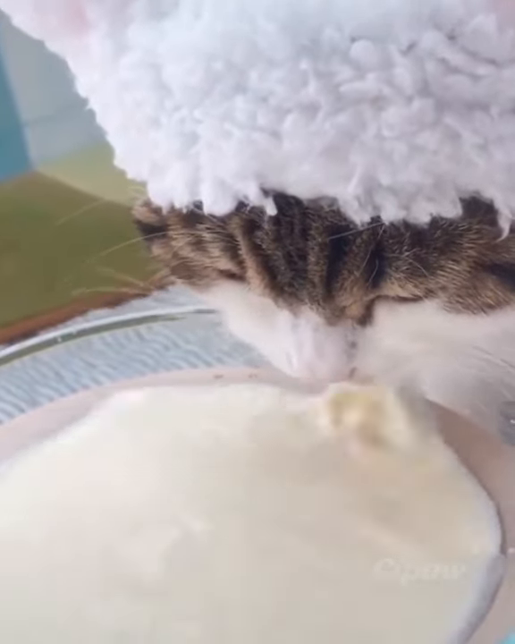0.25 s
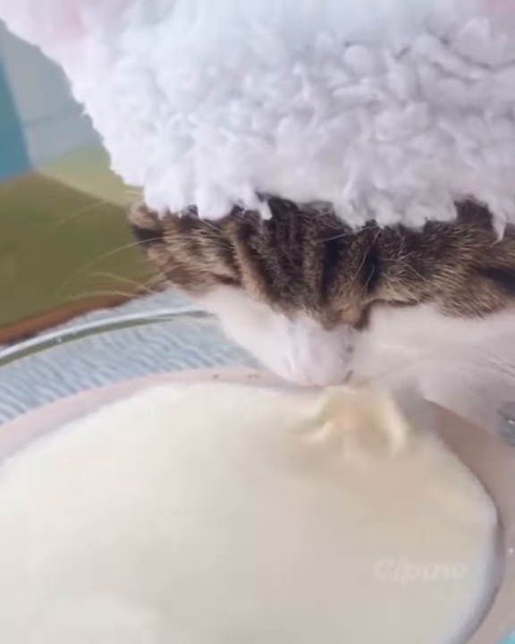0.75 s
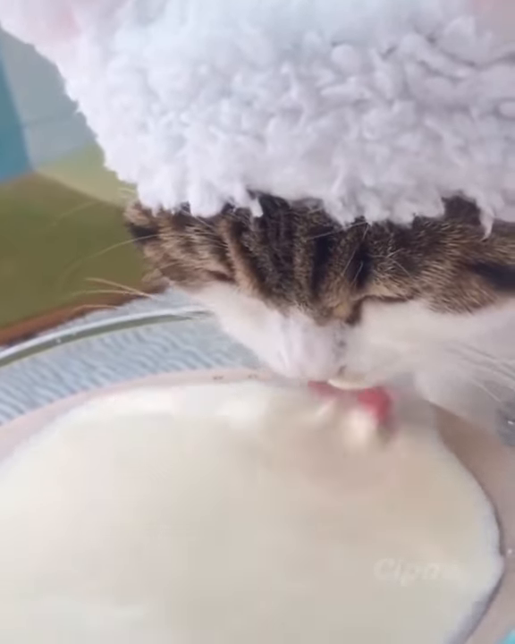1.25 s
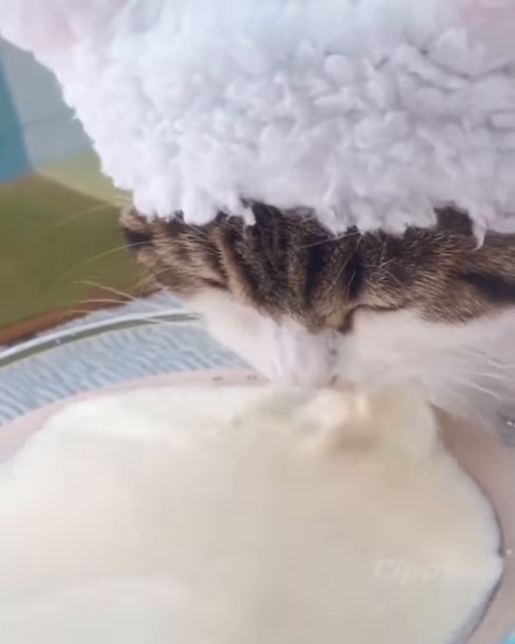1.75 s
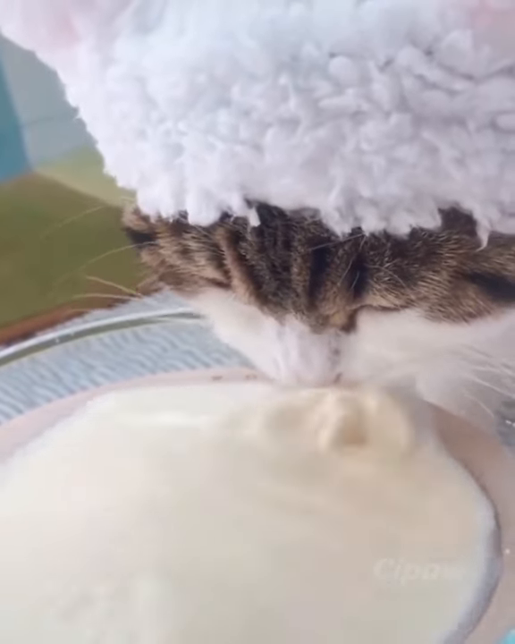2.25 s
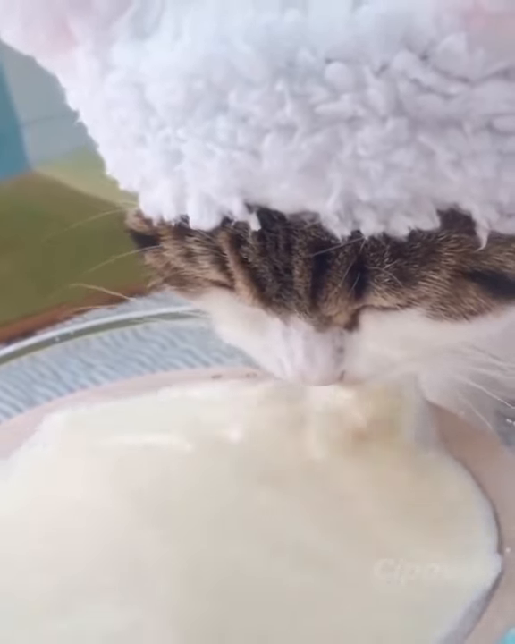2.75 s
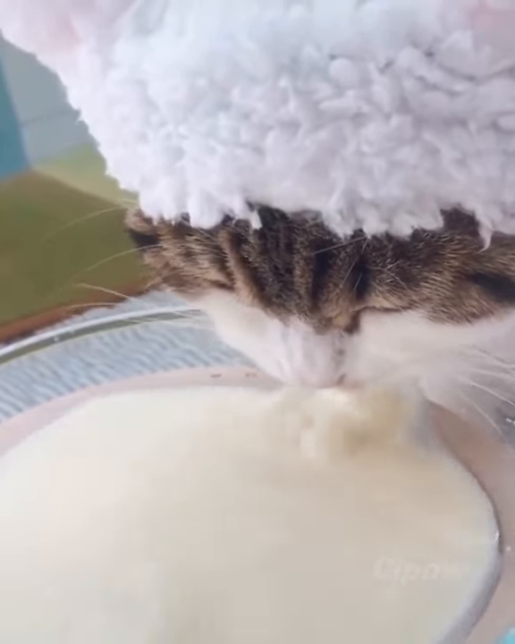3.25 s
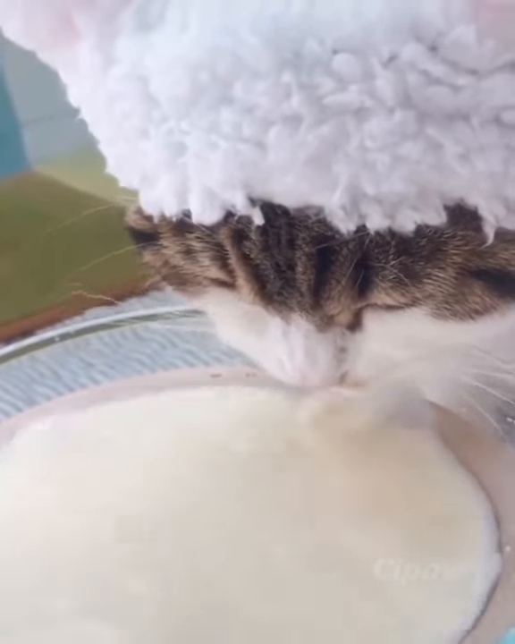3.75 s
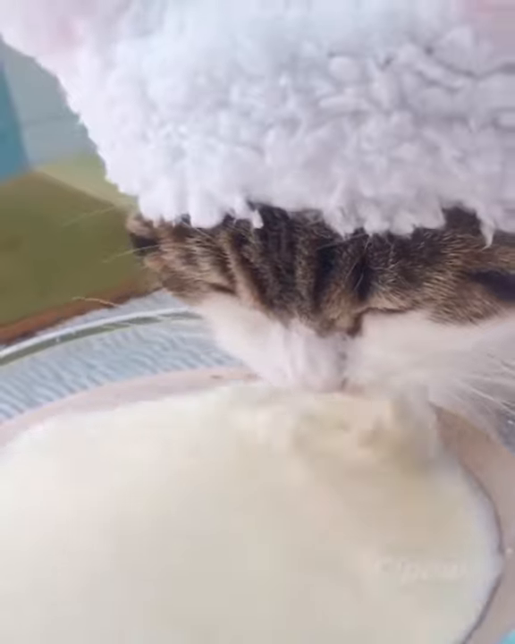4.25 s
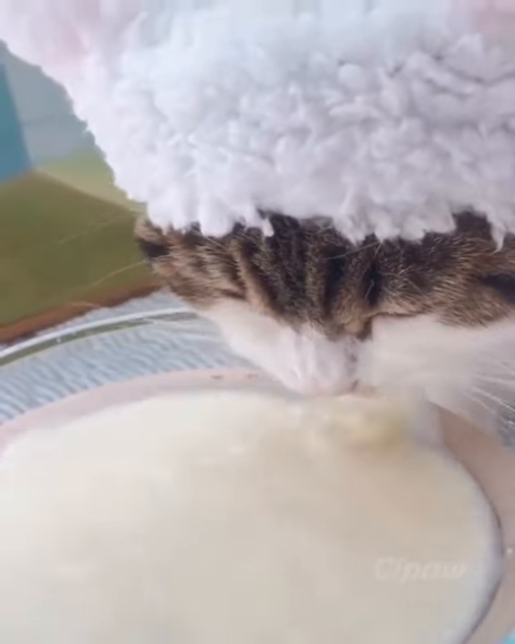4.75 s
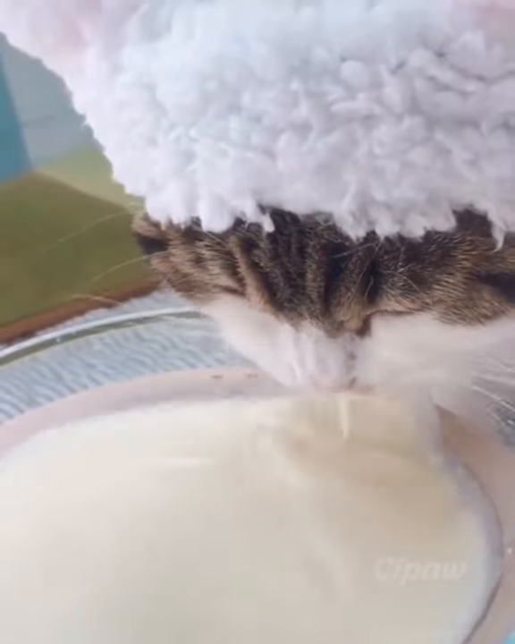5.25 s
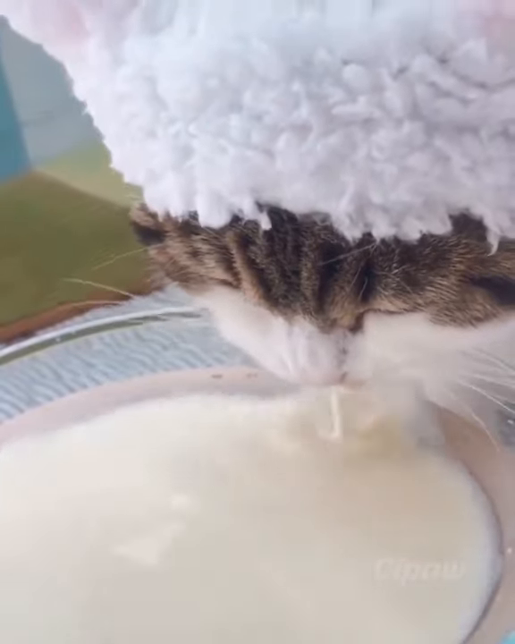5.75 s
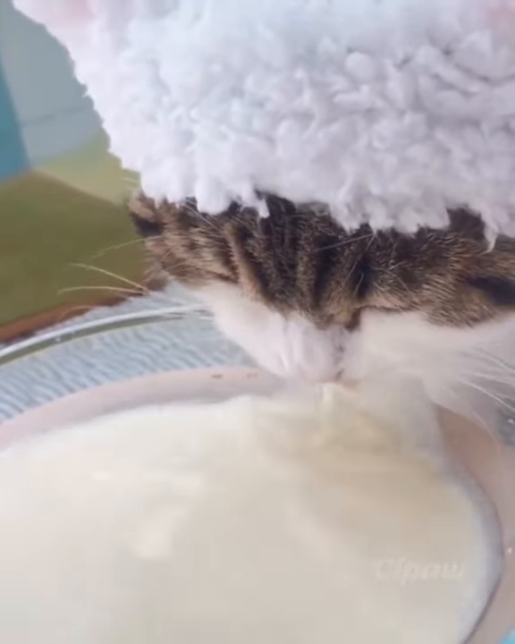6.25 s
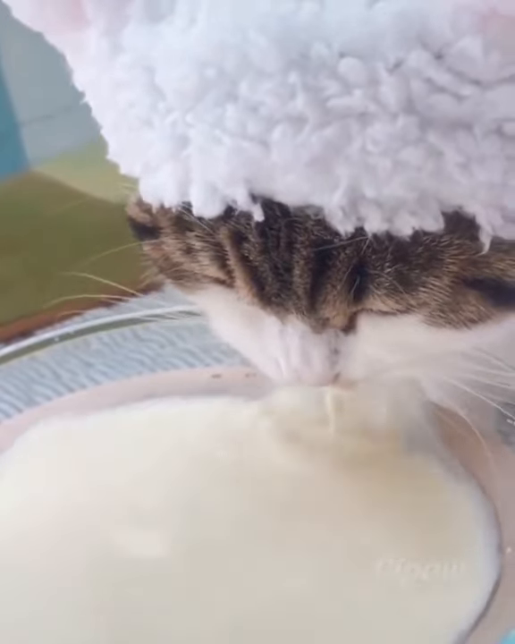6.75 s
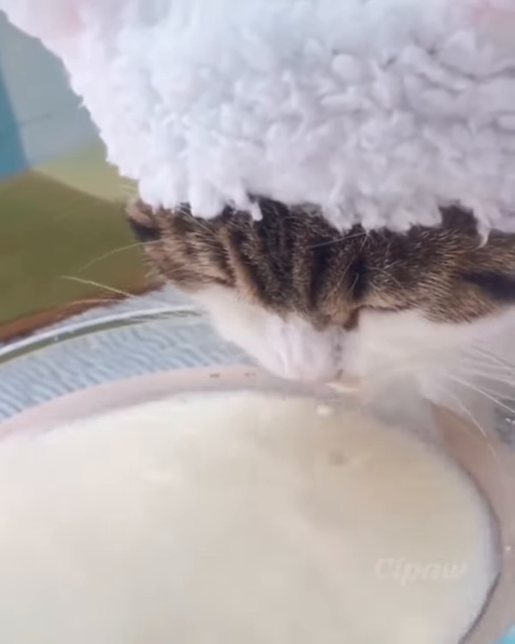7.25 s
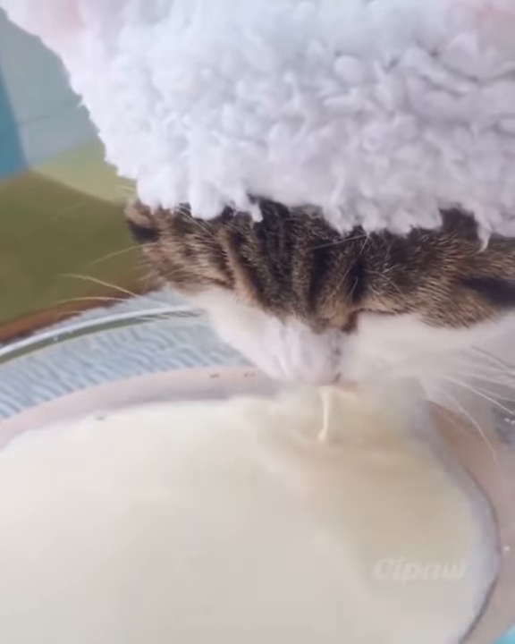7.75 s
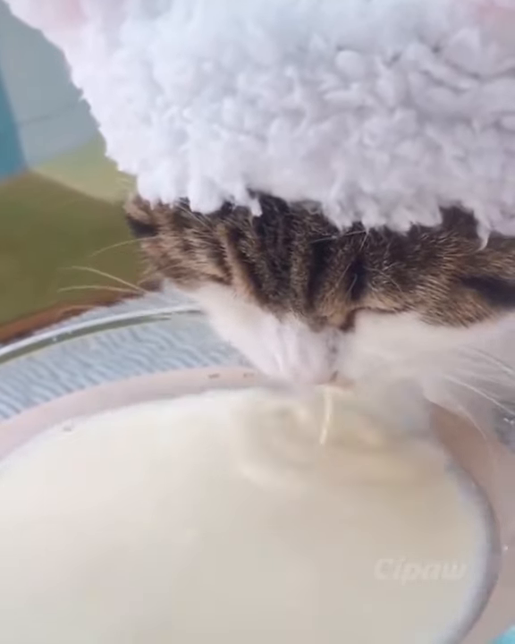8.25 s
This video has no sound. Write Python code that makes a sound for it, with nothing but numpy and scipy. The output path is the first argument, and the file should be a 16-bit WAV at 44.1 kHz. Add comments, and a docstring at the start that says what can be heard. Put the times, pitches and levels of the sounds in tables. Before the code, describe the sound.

A cat laps thick cream right against the microphone, about four laps a second throughout roughly 8.5 seconds. Each lap gives a short, dull, wet smack around 400 to 900 Hz, then sharp sticky clicks at 2 to 6 kHz and fainter irregular ticks; tiny bubble pips often come just before. Clicks are dense and loud from 0.7 to 1.8 s. Bubbly, hollow gulps with rising pitch splutter near 0.3, 1.0, 1.75, 2.75, 3.5, 4.45, 5.4, 6.2 and 6.9 s, strongest at 2.75 and 5.4. The chin rubs the bowl softly at the start and around 3.5, 4.5 and 5.4 s. Low bowl thuds fall near 3.5, 4.6, 5.4, 6.4 and, strongest, 6.75 s. A faint thin squeak dips and rises at 7.5 to 7.7 s. Wavering bright hiss, room rumble and deep hum persist; peaks clip, treble stops near 7 kHz.

```python
"""Cat lapping thick cream, very close

A cat laps from a bowl about four times a second. Each lap is a wet smack of resonated noise grains, then
sharp clicks of parting films; small bubble pips are brief sine tones with a tick, mostly just before a smack.
Now and then air pockets gulp with a rising tone, froth fizzes, the chin rubs the bowl or the bowl is bumped;
late on, a squeak slides. Behind are a wavering hiss and a room rumble of shaped noise, and a deep sine hum.
The close microphone passes little above 7 kHz; loud moments pull its gain down and the highest peaks clip."""
import sys
import numpy as np
from scipy import signal
from scipy.fft import rfft, irfft, next_fast_len
from scipy.io import wavfile

SR = 44100
rng = np.random.default_rng(int(sys.argv[2]) if len(sys.argv) > 2 else 0)


def materialize(psi):
    """Save the field psi as 16-bit PCM at rate SR to the path in sys.argv[1].

    A 1-D psi becomes a single channel; in a 2-D psi each row is a channel.
    """
    bounded = np.clip(np.atleast_2d(psi).T, -1, 1)
    quanta = np.round(bounded * 32767).astype(np.int16)
    wavfile.write(sys.argv[1], SR, quanta)


N = 375732
TIME = np.arange(N) / SR   # seconds
AROUND = np.arange(-2048, 4096) / SR   # seconds before and after a short sound's own moment

# Levels in the tables are relative; each source adds its own gain.
# Smacks, nearly all one per lap, with one extra smack between laps at 4.787 s.
# Each row: time in seconds, smack level in dB, film snap level in dB.
SMACKS = [(0.191, -15, -8.5), (0.465, -16, -11.5), (0.6934, -4, -11), (0.9227, -8.5, -23), (1.201, -8, -11),
          (1.432, -3.5, -21), (1.662, -4, -31), (1.943, -16, -29), (2.175, -21, -12.5),
          (2.4155, -17.5, -20), (2.645, -20.5, -13), (2.914, -19, -15), (3.15, -9, -17), (3.38, -7, -42),
          (3.649, -20.5, -13), (3.8914, -9.5, -12), (4.123, -12, -11), (4.354, -11, -13),
          (4.6298, -8.5, -14.5), (4.787, -13, -10.5), (4.86, -8, -3.5), (5.096, -13.5, -9.5),
          (5.326, -3.5, -34), (5.609, -11, -12.5), (5.844, -10.5, -15.5), (6.0788, -11, -24),
          (6.3744, -16, -20.5), (6.61, -13.5, -10), (6.846, -8.5, -26), (7.117, -25, -15),
          (7.354, -7.5, -21.5), (7.5857, -6, -17), (7.831, -16, -11), (8.0817, -13.5, -11.5),
          (8.314, -9.5, -11.5)]
# Films that click between tongue and palate, loud and faint. Each row: time in seconds, level in dB, pitch in Hz.
CLICKS = [(0.292, -3.5, 3326), (0.326, -9.5, 2330), (.5136, -9, 2190), (0.5233, -6, 3970), (0.698, 0, 3030),
          (0.7005, -13, 6140), (1.001, -6.5, 4050), (1.004, 3.5, 3120), (1.064, -9, 3820),
          (1.1902, 0, 3670), (1.202, -2, 3600), (1.2486, -1.5, 2210), (1.335, -8, 4430),
          (1.4363, -6.5, 3910), (1.47, -5.5, 3170), (1.5127, -10.5, 2400), (1.5824, -5.5, 6060),
          (1.7, -10.5, 3230), (1.765, -5, 2930), (1.8095, -4, 2750), (2.243, -15.5, 2277),
          (2.335, -15, 5760), (2.482, -12.5, 3273), (2.729, -17, 2200), (2.7836, -6, 4700),
          (2.973, -5.5, 4200), (3.07, -9.5, 5800), (3.21, -8, 3080), (3.283, -11, 4550), (3.478, -12, 2080),
          (3.507, -3, 4100), (3.7093, -6.5, 3920), (4.436, -13, 2200), (4.488, -3.5, 2450),
          (4.6389, -6.5, 2270), (4.681, -5, 5830), (4.905, -6, 2300), (4.919, -5.5, 2340),
          (5.017, -13, 2200), (5.148, -5, 3100), (5.419, -17, 2200), (5.434, -18, 2930), (5.451, -11, 2230),
          (5.466, -1, 5900), (5.666, -7, 3600), (6.2294, -3, 5740), (6.423, -9.5, 3860), (6.659, -10, 2260),
          (6.678, -6, 3294), (6.9911, 0, 3570), (7.1754, -5.5, 4100), (7.289, -5.5, 6000),
          (7.414, -13.5, 3289), (7.6525, -4.5, 2240), (7.702, -9, 1920), (7.89, -7.5, 3860),
          (7.939, -9.5, 4414), (7.977, -10.5, 4371), (8.003, -4.5, 2100), (8.139, -13, 3230),
          (8.231, -10, 5400), (8.41, -9.5, 5870)]
# Bright resonances of the mouth. Each row: frequency in Hz, width in Hz, strength in dB.
CLICK_MODES = [(540, 130, 13), (1100, 78, 3), (2195, 125, 1.5), (2930, 186, -5), (3600, 650, -6),
               (4070, 750, -6.5), (4450, 68, -9), (5280, 56, -19), (5850, 79, -4)]


def from_db(db):
    """Decibels to an amplitude factor."""
    return 10 ** (np.asarray(db) / 20)


def rms_one(x):
    """Scale to rms 1."""
    return x / np.sqrt(np.mean(x ** 2) + 1e-20)


def add(out, s, sound):
    """Mix in a short sound, laid out on AROUND, at time s."""
    at = np.round((s + AROUND[0]) * SR).astype(int) + np.arange(len(sound))
    inside = (at >= 0) & (at < N)
    out[at[inside]] += sound[inside]


def drift(rate):
    """Wandering chance of rms 1: straight lines between random values, rate of them a second."""
    knots = rng.standard_normal(4096)
    return rms_one(np.interp(TIME * rate, np.arange(len(knots)), knots))


def coloured_noise(spectrum):
    """Noise with the given spectrum, rms 1."""
    hz, db = np.transpose(spectrum)
    size = next_fast_len(N)
    bins = np.maximum(np.fft.rfftfreq(size, 1 / SR), 1)
    gain = from_db(np.interp(np.log(bins), np.log(hz), db))
    return rms_one(irfft(rfft(rng.standard_normal(size)) * gain, size)[:N])


def resonate(x, modes):
    """Parallel resonances with alternating signs."""
    out = 0
    for k, (hz, width, db) in enumerate(modes):
        r = np.exp(-np.pi * width / SR)
        poles = [1, -2 * r * np.cos(2 * np.pi * hz / SR), r * r]
        gain = (-1) ** k * from_db(db) * (1 - r * r) / 2
        out = out + gain * signal.lfilter([1, 0, -1], poles, x + 1e-18)
    return out


def mouth_shape(modes, centre_hz, focus_db, shift, uneven_db):
    """The mouth favours resonances near a centre, or far from it if focus_db (per squared octave) is
    negative; pitches and strengths vary at each call."""
    hz, width, db = np.transpose(modes)
    detune, strength = rng.standard_normal((2, len(hz)))
    focus = focus_db * np.log2(hz / centre_hz) ** 2
    return np.column_stack([hz * np.exp(shift * detune), width, db + uneven_db * strength - focus])


def ruptures(rise, fall, per_s, snap):
    """A film tears: tiny ruptures crowd round one main snap (rise and fall in seconds)."""
    swell = np.exp(-np.abs(AROUND) / np.where(AROUND < 0, rise, fall))
    struck = rng.random(len(AROUND)) < per_s / SR
    grains = struck * rng.standard_normal(len(AROUND)) * swell
    return grains / (np.linalg.norm(grains) + 1e-9) + snap * (AROUND == 0)


def sized(sound, db, length):
    """Give a sound the energy of a tone of this height in dB and length in seconds."""
    return sound / (np.linalg.norm(sound) + 1e-12) * from_db(db) * np.sqrt(length * SR / 2)


def background(flutter_db, swell_db):
    """A bright, wavering hiss, dipping briefly before each listed click, over the rumble of the room."""
    # Wavering of the hiss. Each row: time in seconds, level in dB.
    hiss_waver = [(0.0, -27), (1.11, -29), (1.35, -23), (1.57, -28), (1.6, -23.5), (1.785, -29.5),
                  (1.815, -21.5), (2.25, -28.5), (2.87, -29.5), (3.68, -29), (5.27, -26), (5.86, -26),
                  (6.41, -32), (6.83, -26), (7.14, -30), (7.43, -24.5), (7.69, -29.5), (8.52, -27.5)]
    # Spectra of the hiss and of the room. Each row: frequency in Hz, relative density in dB per Hz.
    hiss_spectrum = [(900, -17), (1500, -5), (1850, -6.5), (2130, -0.5), (2700, -2), (3300, -4.5),
                     (4000, -0.5), (4750, -3), (5300, 2.5), (5950, 0), (6450, -2), (7100, -4), (7600, -7.5)]
    room_spectrum = [(12, -25.5), (24, 0), (39, 0), (52, -1), (80, -10), (122, -6.5), (165, -15.5),
                     (220, -13), (300, -18.5), (400, -18), (750, -26), (1100, -25), (1500, -38),
                     (3000, -47.5)]
    hiss_db, room_db = 1.33, -23
    dip_db, dip_before_s, dip_s = 4, 0.0097, 0.011
    dips = np.zeros(N)
    for s, _, _ in CLICKS:
        add(dips, s - dip_before_s, np.exp(-(AROUND / dip_s) ** 2))
    level_db = np.interp(TIME, *np.transpose(hiss_waver)) - dip_db * np.minimum(dips, 1)
    hiss = from_db(hiss_db + level_db + flutter_db * drift(70)) * coloured_noise(hiss_spectrum)
    room = from_db(room_db + swell_db * drift(11)) * coloured_noise(room_spectrum)
    return hiss + room


def hum(level_db, pitch_hz, waver):
    """A deep sine hum that wanders a little in pitch."""
    pitch = pitch_hz * (1 + waver * drift(9.8))
    return from_db(level_db) * np.sin(2 * np.pi * np.cumsum(pitch) / SR)


def rubs(gain_db):
    """The chin's fur drags along the rim: noise under swelling pressure makes the bowl drone softly."""
    # Each row: time of most pressure in seconds, level in dB, length of rise and of fall in seconds.
    chin_rubs = [(0.148, -23.5, 0.12), (3.538, -18, 0.019), (4.511, -12, 0.012), (4.656, -13, 0.032),
                 (5.433, -10, 0.031)]
    # Hollow of the bowl. Each row: frequency in Hz, width in Hz, strength in dB.
    bowl_modes = [(147, 63, -5.5), (260, 150, -0.5), (410, 10, 5.5), (640, 96, -17)]
    pressure = sum(from_db(db + gain_db) * np.exp(-np.abs(TIME - s) / length)
                   for s, db, length in chin_rubs)
    return pressure * rms_one(resonate(rng.standard_normal(N), bowl_modes))


def pips(gain_db, pitch_hz, decay_s, tick_db):
    """The tongue leaves the cream: the film ticks as it parts, and a small bubble rings for milliseconds."""
    # Mostly just before a smack. Each row: time in seconds, level in dB.
    bubbles = [(.131, -14), (.41, -11), (1.37, -9.5), (2.1, -16.5), (2.58, -11.5), (3.808, -11.5),
               (3.966, -8.5), (4.273, -10), (4.707, -14), (5.278, -9), (5.555, -6), (6.018, -12),
               (6.546, -16.5), (8.361, -12.5)]
    out = np.zeros(N)
    age = np.maximum(AROUND, 0)
    swell = age / decay_s * np.exp(1 - age / decay_s)
    for (s, db), detune in zip(bubbles, rng.standard_normal(len(bubbles))):
        tone = swell * np.sin(2 * np.pi * pitch_hz * (1 + 0.031 * detune) * age)
        tear = ruptures(rise=decay_s, fall=2 * decay_s, per_s=1800, snap=0.28)
        tick = resonate(tear, CLICK_MODES[2:])
        add(out, s, from_db(db + gain_db) * (tone + sized(tick, tick_db, decay_s)))
    return out


def smacks(gain_db, lead_s, length, soft_hz, crackle_db):
    """Cream is squeezed as the jaw shuts: a soft touch, then a short, dull pop with a wet crackle round it."""
    # Resonances of the mouth over the bowl. Each row: frequency in Hz, width in Hz, strength in dB.
    smack_modes = [(398.3, 20, 2), (526, 64, 4), (661, 80, -5), (890, 130, -5.5), (1150, 130, -8.5),
                   (2070, 160, -12)]
    touch_before_s, touch_db, touch_hz = 0.0066, -8, 450   # the tongue lands softly just before
    dull, wet = np.zeros(N), np.zeros(N)
    for s, db, _ in SMACKS:
        touch = resonate(ruptures(rise=.003, fall=0.0022, per_s=2800, snap=0), [(touch_hz, 300, 0)])
        squeeze = ruptures(rise=0.14 * length, fall=0.86 * length, per_s=2900, snap=1.6)
        modes = mouth_shape(smack_modes, centre_hz=664, focus_db=-2.5, shift=0.017, uneven_db=1.5)
        spatter = ruptures(rise=0.0018, fall=0.0046, per_s=900, snap=0.48)
        crackle = resonate(spatter, CLICK_MODES[2:])
        add(dull, s - touch_before_s, sized(touch, db + touch_db, length))
        add(dull, s - lead_s, sized(resonate(squeeze, modes), db + gain_db, length))
        add(wet, s, sized(crackle, db + crackle_db, length))
    return wet + signal.sosfilt(signal.butter(3, soft_hz, fs=SR, output="sos"), dull)


def films():
    """Films that part, as (s, dB, length s, pitch Hz): the listed ones, then a snap and ticks per smack."""
    # Faint films part as the mouth reopens. Each row: seconds after the smack, level in dB.
    faint_ticks = [(.055, -17), (.085, -18), (.16, -18)]
    click_length_s, doubling_db = 0.0021, 10.5   # length at 0 dB; it doubles with each such rise in level
    snap_after_s, snap_length_s, snap_hz, snap_spread_octaves = 0.002, 0.0035, 2280, 0.086
    tick_scatter_s, tick_uneven_db, tick_length_s = 0.011, 3, 0.003
    tick_hz, tick_spread_octaves = 4100, 0.84
    rows = [(s, db, click_length_s * 2 ** (db / doubling_db), hz) for s, db, hz in CLICKS]
    for s, _, snap_db in SMACKS:
        pitch = snap_hz * 2 ** (snap_spread_octaves * rng.standard_normal())
        rows.append((s + snap_after_s, snap_db, snap_length_s, pitch))
        for after, db in faint_ticks:
            late, strong, high = rng.standard_normal(3)
            start = s + after + tick_scatter_s * late
            pitch = tick_hz * 2 ** (tick_spread_octaves * high)
            rows.append((start, db + tick_uneven_db * strong, tick_length_s, pitch))
    return rows


def clicks(gain_db, lead_s, spray_db, ring_db, ring_width_hz, crack_db):
    """Each film cracks, rings at its own pitch, sounds the mouth and trails a few tiny after-ticks."""
    mouth_hz = 4800   # the mouth favours the midpoint, in octaves, between this and the film's pitch
    crack_band = signal.butter(3, [2000, 7000], "band", fs=SR, output="sos")
    out = np.zeros(N)
    for s, db, length, hz in films():
        snap = ruptures(rise=.15 * length, fall=1.0 * length, per_s=7000, snap=.9)
        spray = from_db(spray_db) * ruptures(rise=.002, fall=.012, per_s=250, snap=0)
        modes = mouth_shape(CLICK_MODES, np.sqrt(hz * mouth_hz), focus_db=3.5, shift=0.038, uneven_db=2.5)
        ring = sized(resonate(snap, [(hz, ring_width_hz, 0)]), db + ring_db, length)
        crack = sized(signal.sosfilt(crack_band, snap), db + crack_db, length)
        mouth = sized(resonate(snap + spray, modes), db + gain_db, length)
        add(out, s - lead_s, crack + ring + mouth)
    return out


def gulps(gain_db, attack_s, glide, soft_hz, hollow_db, crackle_db, churn_db):
    """An air pocket pops with a crackle, rings at a rising pitch and stirs the mouth; small bubbles churn."""
    # Every third or fourth lap, pockets pop in a quick splutter.
    # Each row, one pocket: time in seconds, level in dB, length in seconds, starting pitch in Hz.
    air_pockets = [(0.2668, -3, 0.0038, 1305), (0.2703, -4.5, 0.0034, 1090), (0.286, -14, 0.0053, 1000),
                   (0.318, -6.5, .0012, 1170), (1.0025, -1.5, 0.0065, 1230), (1.036, -7, 0.0024, 1350),
                   (1.754, -7, 0.0045, 1320), (2.72, 0.5, 0.0059, 873), (2.726, -4.5, 0.01, 1210),
                   (2.745, 3.5, 0.0043, 1100), (2.748, 1, 0.015, 640), (2.758, 2, 0.003, 1140),
                   (2.76, -16, 0.0053, 940), (3.466, -3, 0.0022, 1100), (3.469, -4, 0.003, 890),
                   (3.472, -1.5, 0.0047, 1340), (3.4962, 1.5, 0.0015, 980), (3.4978, -9, 0.012, 617),
                   (4.426, -3.5, 0.0051, 1100), (4.4303, -3.5, 0.0098, 1073), (4.435, -4, .003, 1360),
                   (4.466, -5, 0.0012, 950), (5.381, -11, 0.0053, 1150), (5.3984, -4.5, 0.0056, 1140),
                   (5.4029, -1, 0.01, 597), (5.412, -6, 0.0072, 1140), (5.428, 4.5, 0.018, 608),
                   (5.431, 4.5, 0.0094, 1140), (5.453, -4, 0.0021, 960), (5.455, 0.5, 0.014, 610),
                   (6.1655, -3.5, 0.0038, 1145), (6.939, -10, 0.014, 1134), (6.942, 4, 0.0027, 1200)]
    # Hollow of the mouth. Each row: frequency in Hz, width in Hz, strength in dB.
    gulp_modes = [(592, 114, 6), (908, 47, 3.5), (1140, 110, 1), (1564, 130, -6), (2016, 43, -1.5),
                  (3600, 470, -21)]
    out = np.zeros(N)
    age = np.maximum(AROUND, 0)
    for s, db, length, hz in air_pockets:
        swell = (1 - np.exp(-age / attack_s)) * np.exp(-(age / (1.03 * length)) ** 2)
        bend = glide * rng.uniform(0, 1.6)
        pocket = swell * np.sin(2 * np.pi * hz * (age + bend * age ** 2))
        tear = ruptures(rise=.2 * length, fall=.85 * length, per_s=4000, snap=0.3)
        hollow = resonate(tear, mouth_shape(gulp_modes, hz, focus_db=3.5, shift=.003, uneven_db=1.5))
        churn = resonate(ruptures(rise=0.042, fall=0.029, per_s=390, snap=0), gulp_modes)
        spatter = ruptures(rise=0.25 * length, fall=0.66 * length, per_s=1000, snap=0)
        crackle = resonate(spatter, CLICK_MODES[2:6])
        parts = [(pocket, 0), (hollow, hollow_db), (crackle, crackle_db), (churn, churn_db)]
        add(out, s, sum(sized(part, db + gain_db + part_db, length) for part, part_db in parts))
    # soft tissue dulls the top
    return signal.sosfilt(signal.butter(2, soft_hz, fs=SR, output="sos"), out)


def fizzes(gain_db):
    """Froth on the tongue: many tiny bubbles burst together in a short, soft swell."""
    # Each row: time in seconds, level in dB, length in seconds.
    froth_bursts = [(1.2, -18, 0.025), (4.91, -20, 0.02), (6.691, -22, 0.011), (6.99, -13, 0.0026)]
    out = np.zeros(N)
    for s, db, length in froth_bursts:
        froth = ruptures(rise=.8 * length, fall=length, per_s=2500, snap=0)
        modes = mouth_shape(CLICK_MODES, centre_hz=3700, focus_db=7, shift=.012, uneven_db=1.5)
        add(out, s, sized(resonate(froth, modes), db + gain_db, length))
    return out


def bumps(gain_db, rub_db, knock_db):
    """The bowl answers a nudge with a brief knock and a low thud that sags in pitch."""
    # Each row: time in seconds, level in dB, starting pitch in Hz, decay by 60 dB in seconds,
    # time for the pitch to halve in seconds.
    bowl_bumps = [(1.67, -16, 134, 0.42, 0.32), (3.48, -8, 153, 0.076, 0.019),
                  (4.64, -11.5, 167, 0.21, 0.063), (5.407, -8, 195, 0.22, 0.027),
                  (6.42, -8.5, 95, 0.19, 0.027), (6.734, -2, 260, 0.13, 0.0053),
                  (6.7646, -1.5, 184, 0.14, 0.026)]
    out = np.zeros(N)
    age = np.maximum(AROUND, 0)
    for s, db, hz, t60, sag_s in bowl_bumps:
        rub = rms_one(resonate(rng.standard_normal(len(age)), [(2.2 * hz, hz, 0)]))
        tone = -np.sin(2 * np.pi * hz * sag_s * np.log1p(age / sag_s))
        thud = tone + from_db(rub_db) * rub * (age > 0)
        knock = sized(resonate(1.0 * (AROUND == 0), [(1300, 1900, 0)]), knock_db, 0.0029)
        add(out, s, from_db(db + gain_db - 60 * age / t60) * (thud + knock))
    return out


def squeak(waver, flutter_db):
    """A thin sine, unsteady in pitch and level, slides down and back up."""
    # Each row: time in seconds, pitch in Hz, level in dB.
    slide = [(7.51, 1187, -44), (7.526, 1140, -25), (7.565, 1037, -33.5), (7.617, 1014, -28.5),
             (7.701, 1110, -35)]
    s, hz, db = np.transpose(slide)
    pitch = np.interp(TIME, s, hz) * (1 + waver * drift(220))
    level_db = np.interp(TIME, s, db, left=-200, right=-200) + flutter_db * drift(120)
    return from_db(level_db) * np.sin(2 * np.pi * np.cumsum(pitch) / SR)


def reflections(x, echo_s, echo_db, low_hz, high_hz, wet_db, t60):
    """A small nearby surface returns one echo of the upper middle; the room adds a short, diffuse tail."""
    age = TIME[:SR // 4]
    tail = rng.standard_normal(len(age)) * from_db(-60 * age / t60) * (age > echo_s)
    band = signal.butter(2, [low_hz, high_hz], "band", fs=SR, output="sos")
    returned = signal.sosfilt(band, x)
    echo = from_db(echo_db) * np.interp(TIME - echo_s, TIME, returned, left=0)
    return echo + from_db(wet_db) * signal.fftconvolve(x, tail / np.linalg.norm(tail))[:N]


def gain_control(x, threshold_db, slope, release_db_per_s):
    """Loud moments pull the gain down, and the hiss sinks with it for an instant."""
    power = signal.lfilter([1 / 256], [1, -255 / 256], x[0] ** 2)   # smoothed over about 256 samples
    level_db = 10 * np.log10(np.maximum(power, 1e-12))
    over = np.maximum(level_db - threshold_db, 0) * slope
    # the reduction jumps up at once, then falls at a steady rate
    held = np.maximum.accumulate(over + release_db_per_s * TIME) - release_db_per_s * TIME
    attack = np.exp(-1 / (0.014 * SR))   # smooths the reduction over 14 ms
    return x * from_db(-signal.lfilter([1 - attack], [1, -attack], held))


def scene():
    """The cat and its reflections, with the bumped bowl, hum, hiss and room beside them."""
    cat = rubs(gain_db=-1) + pips(gain_db=-4, pitch_hz=2090, decay_s=0.0017, tick_db=-1.5)
    cat += smacks(gain_db=-0.5, lead_s=0.0007, length=0.0086, soft_hz=1770, crackle_db=-12)
    cat += clicks(gain_db=-3.5, lead_s=.0003, spray_db=-14.5, ring_db=-3.5, ring_width_hz=245, crack_db=-6.5)
    cat += gulps(gain_db=-5.0, attack_s=0.00021, glide=1.96, soft_hz=4200,
                 hollow_db=-2.5, crackle_db=-14, churn_db=-13)
    cat += fizzes(gain_db=9.0) + squeak(waver=0.0157, flutter_db=3.0)
    space = reflections(cat, echo_s=0.0086, echo_db=-6, low_hz=1740, high_hz=3380, wet_db=-12.0, t60=0.24)
    bowl = bumps(gain_db=3.5, rub_db=-17.0, knock_db=-10)
    place = hum(level_db=-25.0, pitch_hz=38.8, waver=0.0614) + background(flutter_db=2.5, swell_db=1.5)
    return (cat + space + bowl + place)[None]


def record(dry):
    """The microphone cuts off steeply at the top; the gain ducks, and the loudest peaks clip."""
    mic_edge_hz, cutoff_hz = 7200, 16000
    narrow = signal.sosfilt(signal.ellip(10, .3, 80, mic_edge_hz, fs=SR, output="sos"), dry)
    levelled = gain_control(narrow, threshold_db=-7.5, slope=0.77, release_db_per_s=52.0)
    clipped = np.clip(levelled, -1, 1)
    # remove what clipping adds above the cutoff
    return signal.sosfilt(signal.cheby2(12, 70, cutoff_hz, fs=SR, output="sos"), clipped)


dry = scene()
out = record(dry)
materialize(out)
```